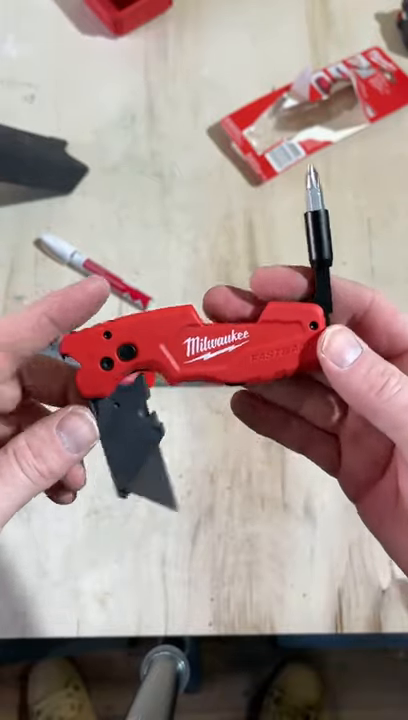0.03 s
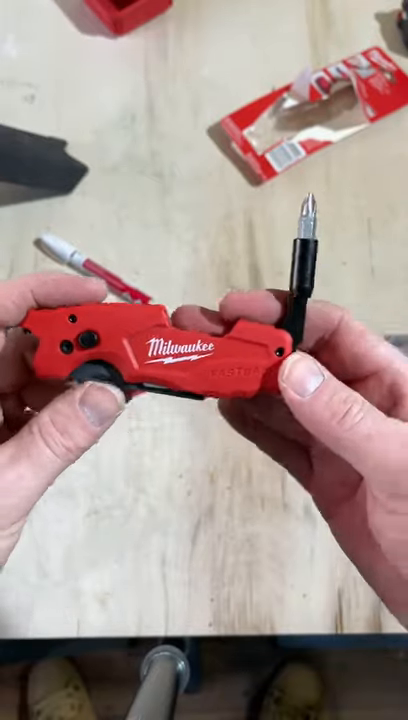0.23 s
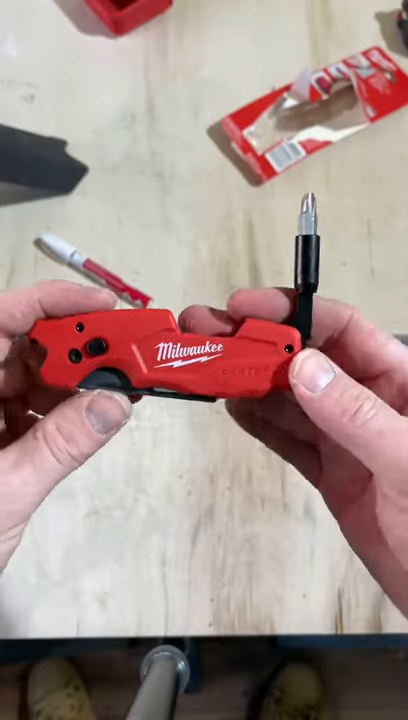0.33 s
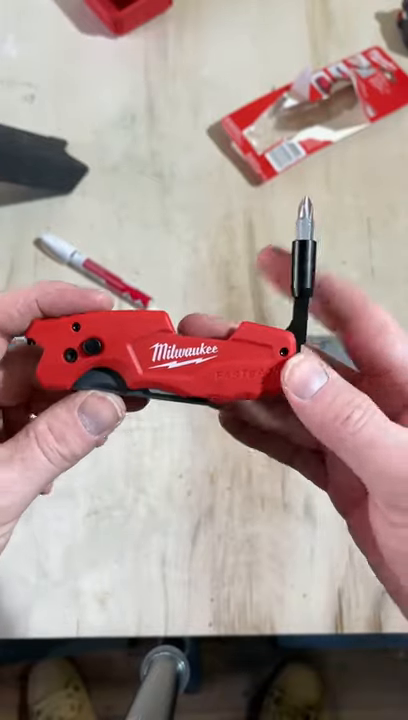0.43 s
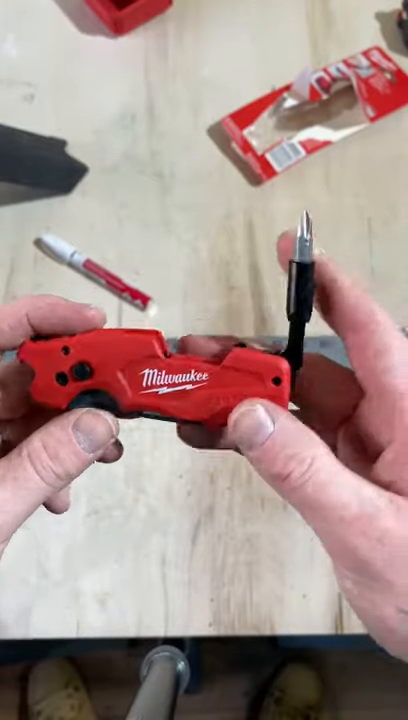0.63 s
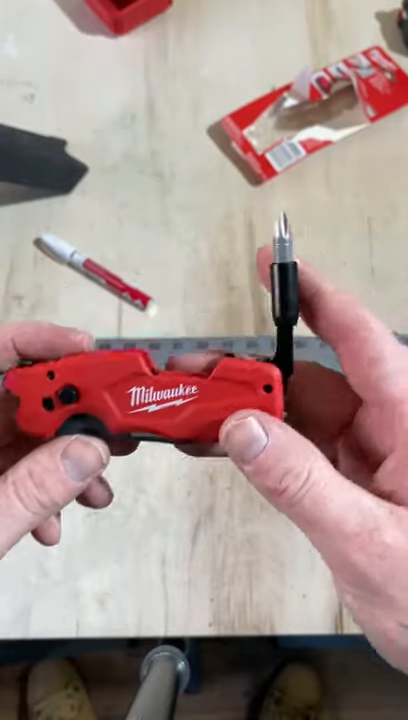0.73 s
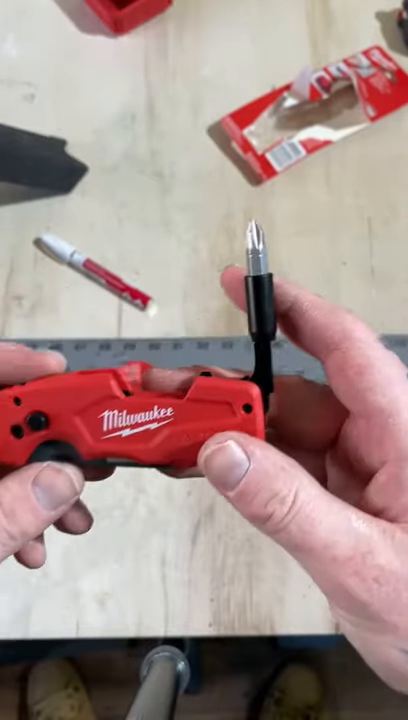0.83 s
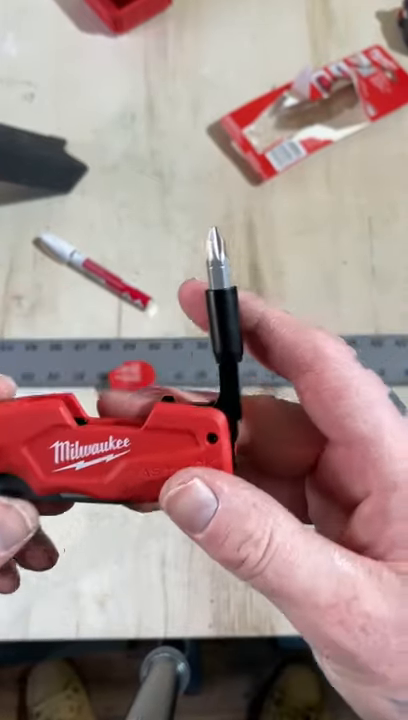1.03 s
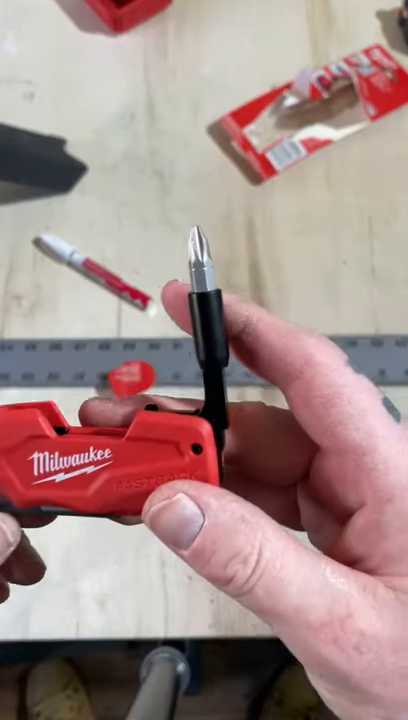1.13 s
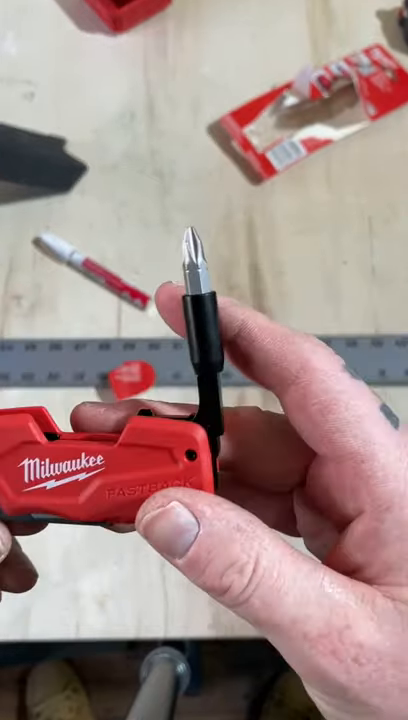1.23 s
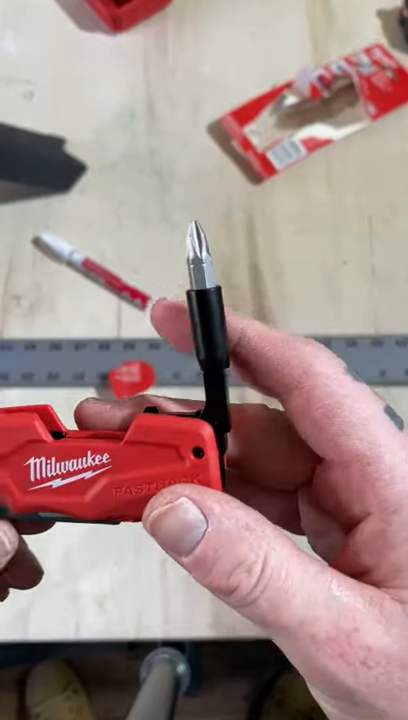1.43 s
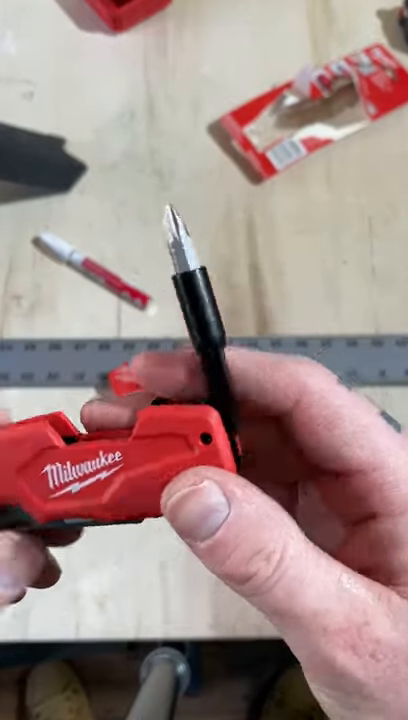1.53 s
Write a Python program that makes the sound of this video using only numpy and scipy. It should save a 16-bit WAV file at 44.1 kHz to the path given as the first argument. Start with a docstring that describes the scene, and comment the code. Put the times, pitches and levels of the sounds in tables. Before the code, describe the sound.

Faint finger rubbing, then the bright, sharp snap of a folding utility knife closing.

```python
"""A small room, over a workbench: a hand closes a folding utility knife.
Fingers rub the handle and the blade slides in, both a grainy, high friction hiss. The blade snaps
home in a burst of metal contacts, each a bright crack that rings the knife and the room.
The grip shifts and the handle ticks twice, damped by the hand. A low rumble lies underneath."""
import sys
import numpy as np
from scipy import signal
from scipy.fft import rfft, irfft
from scipy.io import wavfile
from scipy.ndimage import uniform_filter1d

SR = 44100
rng = np.random.default_rng(int(sys.argv[2]) if len(sys.argv) > 2 else 0)


def master(y):
    """Save y as 16-bit WAV."""
    cut = np.clip(np.atleast_2d(y).T, -1, 1)
    pcm = np.round(cut * 32767)  # scale
    wavfile.write(sys.argv[1], SR, pcm.astype(np.int16))


N = 70560
TIME = np.arange(N) / SR
HIT_TIME, ROOM_TIME = TIME[:SR // 16], TIME[:SR // 2]

# tone of the background rumble: frequency_hz, relative_db
RUMBLE_SPECTRUM = [(20, -15), (30, -11), (42, 3), (70, -3), (95, -12.5), (125, -12), (185, -19),
                   (240, -14.5), (320, -26), (500, -33), (1000, -42), (2500, -48.5), (4800, -54.5),
                   (7000, -53), (11000, -57), (15000, -56)]
# strokes of the fingers and the sliding blade: start_s, length_s, swell_s, low_db, middle_db, high_db
RUB_STROKES = [(0.071, .087, .045, -87, -77.5, -72.5), (0.161, 0.075, .005, -93, -88.5, -80),
               (0.231, .012, .016, -49, -49, -59), (0.442, 0.05, 0.0026, -70.5, -77, -86.5),
               (0.505, .055, .015, -85.5, -81, -84), (1.53, .09, .06, -87, -82, -84.5)]
# resonances that friction excites: pitch_hz, half_width_hz, band (0 low, 1 middle, 2 high)
RUB_RESONANCES = [(2480, 110, 0), (2820, 120, 0), (3650, 220, 0), (4150, 150, 1), (4520, 130, 1),
                  (5550, 350, 1), (7000, 1200, 1), (10400, 700, 2), (11700, 600, 2)]
# metal contacts of the blade and lock: start_s, level_db, dull_above_hz
SNAP_CONTACTS = [(0.2424, -9.5, 4507), (0.2434, -6, 4488), (0.2466, -4, 9000), (0.2476, -3, 12000),
                 (0.2490, 0.5, 12000), (0.2498, 0, 9000), (0.2519, -9, 12000), (0.2555, -13, 12000),
                 (0.2577, -13.5, 14000)]
# ring of the blade and handle, over a low 140 Hz thump: pitch_hz, level_db, t60_s
KNIFE_RING = [(140, -54.5, 0.089), (680, -42, 0.02), (800, -43.5, 0.015), (990, -41.5, 0.019),
              (1220, -35, .018), (1520, -28, .02), (2024, -25.5, 0.021), (2372, -23.5, 0.017),
              (2582, -21, .022), (2790, -22, .019), (3200, -20, 0.02194), (4040, -15, .019),
              (4317, -15, .019), (5477, -10, .016), (5790, -17.5, 0.021), (6410, -20.5, .016),
              (6890, -16.5, 0.016), (7635, -16.5, 0.013), (10690, -18, .015), (11686, -15, 0.019)]
# tone of each contact's crack: frequency_hz, relative_db
CRACK_SPECTRUM = [(150, -24), (450, -32), (700, -12), (1400, -4), (2500, 1), (4100, 2), (5500, 2.5),
                  (6500, 2), (8000, 4.5), (10000, 5), (12000, 5.5), (15000, -1.5)]
# ticks of the handle in the grip: start_s, level_db, dull_above_hz
GRIP_TICKS = [(0.7495, -49, 6000), (0.8013, -54, 2800)]
# ring of the gripped handle: pitch_hz, level_db, t60_s
GRIP_RING = [(419.6, -8.5, 0.034), (716, -11, .03), (1290, -4, .024), (1700, -8, .02), (3270, -6, 0.015),
             (4598, -4, .006), (10900, -16, .006)]
# tone of each tick's dull knock: frequency_hz, relative_db
KNOCK_SPECTRUM = [(200, -2.5), (450, 3), (1000, 1), (1900, -4), (2600, -13), (3300, -9.5), (4800, -9),
                  (5800, -22), (12000, -25)]
# tone of the room's tail: frequency_hz, relative_db
ROOM_SPECTRUM = [(300, 14.5), (700, 4), (1400, 3.5), (2150, -1), (2450, 7), (3300, 1), (4100, 4.5),
                 (5500, 5.5), (6600, 8), (8000, 4.5), (10000, 6), (12000, 0), (15000, 5)]
# decay of the room's tail: frequency_hz, t60_s
ROOM_DECAY = [(500, .36), (1300, 0.27), (3500, .265), (7000, .275), (12000, 0.18)]
# the microphone's uneven treble: frequency_hz, gain_db
MICROPHONE_EQ = [(1000, 0), (8000, 0), (8800, -10), (9600, -1), (11900, 0), (13300, -4), (14300, -21.5),
                 (16000, -24)]

ROOM_SEND_DB, RING_SEND_DB, TICK_SEND_DB = -14.5, -32, -7.5


def from_db(db):
    """Decibels to gain."""
    return 10 ** (np.asarray(db) / 20)


def rms_one(x):
    """Scale to an rms of one."""
    return x / np.sqrt(np.mean(x ** 2) + 1e-20)


def at_hz(points, hz):
    """Read a table on a log-frequency axis."""
    frequencies, values = np.transpose(points)
    return np.interp(np.log(np.maximum(hz, 1)), np.log(frequencies), values)


def convolve(x, response):
    """Pass a sound through an impulse response."""
    return signal.oaconvolve(x, response)[:len(x)]


def equalise(x, curve, size=2048):
    """Minimum-phase EQ along a curve of frequency_hz, gain_db."""
    gain = from_db(at_hz(curve, np.fft.rfftfreq(size, 1 / SR)))
    cepstrum = irfft(np.log(gain))
    cepstrum[1:size // 2] *= 2  # folded forward, so nothing rings ahead of an attack
    cepstrum[size // 2 + 1:] = 0
    return convolve(x, irfft(np.exp(rfft(cepstrum))))


def band_noise(low_hz, high_hz, count=N):
    """White noise through a band-pass."""
    bandpass = signal.butter(2, [low_hz, high_hz], "band", fs=SR, output="sos")
    return signal.sosfilt(bandpass, rng.standard_normal(count))


def rumble(level_db=-56.5):
    """A steady bed of low room rumble with a trace of hiss."""
    tone = from_db(at_hz(RUMBLE_SPECTRUM, np.fft.rfftfreq(N, 1 / SR)))
    bed = irfft(rfft(rng.standard_normal(N)) * tone, N)
    return from_db(level_db) * rms_one(bed)


def rubs(grain_s=0.0014, grain_db=2, release_s=0.02):
    """Grainy friction excites three bands of resonances; each stroke swells and fades."""
    roughness = rms_one(uniform_filter1d(rng.standard_normal(N), int(grain_s * SR)))
    grain = from_db(grain_db * roughness)
    bands, friction = np.zeros((3, N)), 0
    for hz, half_width_hz, band in RUB_RESONANCES:
        bands[band] += rms_one(band_noise(hz - half_width_hz, hz + half_width_hz))
    bands = np.array([rms_one(band * grain) for band in bands])
    for start_s, length_s, swell_s, *levels_db in RUB_STROKES:
        swell = np.clip((TIME - start_s) / swell_s, 0, 1)
        fade = np.clip((start_s + length_s - TIME) / release_s + 0.5, 0, 1)
        friction += swell * fade * (from_db(levels_db) @ bands)
    return friction


def room_reverb(x, onset_s=0.003):
    """The small room answers with a diffuse tail that builds quickly and dies band by band."""
    edges_hz, tail = np.geomspace(200, 18000, 12), 0
    for low_hz, high_hz in zip(edges_hz, edges_hz[1:]):
        t60_s = at_hz(ROOM_DECAY, np.sqrt(low_hz * high_hz))
        tail += band_noise(low_hz, high_hz, len(ROOM_TIME)) * from_db(-60 * ROOM_TIME / t60_s)
    build_up = np.minimum(ROOM_TIME / onset_s, 1) ** 2
    tail = equalise(tail * build_up, ROOM_SPECTRUM)
    return convolve(x, rms_one(tail) / np.sqrt(len(tail)))  # a tail of unit energy


def hit(response, start_s, level_db, dull_above_hz):
    """Set a response off on cue, at its own level, dulled above its own cutoff."""
    track, start = np.zeros(N + SR), int(start_s * SR)
    pole = np.exp(-2 * np.pi * dull_above_hz / SR)
    dulled = signal.lfilter([1 - pole], [1, -pole], response)
    track[start:start + len(response)] = from_db(level_db) * dulled
    return track[:N]


def ringing(modes):
    """A struck body rings as damped sines of alternating sign."""
    return sum((-1) ** k * from_db(db - 60 * HIT_TIME / t60_s) * np.sin(2 * np.pi * hz * HIT_TIME)
               for k, (hz, db, t60_s) in enumerate(modes))


def contact_burst(spectrum, energy_db, t60_s):
    """A rough contact gives a burst of noise that dies at once."""
    burst = rng.standard_normal(len(HIT_TIME)) * from_db(-60 * HIT_TIME / t60_s)
    return from_db(energy_db) * rms_one(equalise(burst, spectrum)) / np.sqrt(len(burst))


def cracks():
    """The bright crack of every metal contact, as it leaves the knife in one direction."""
    return sum(hit(contact_burst(CRACK_SPECTRUM, energy_db=3, t60_s=0.0077), *contact)
               for contact in SNAP_CONTACTS)


def snap(directions=3):
    """The blade snaps home: crack and ring arrive direct, cracks thrown elsewhere return as reverb."""
    body = ringing(KNIFE_RING)
    ring = sum(hit(body, *contact) for contact in SNAP_CONTACTS)
    direct = cracks() + ring
    scattered = sum(room_reverb(cracks()) for _ in range(directions)) / np.sqrt(directions)
    return direct + from_db(ROOM_SEND_DB) * scattered + from_db(RING_SEND_DB) * room_reverb(ring)


def grip_ticks():
    """Soft knocks in the handle as the grip shifts, damped by the hand."""
    ring = ringing(GRIP_RING)
    return sum(hit(ring + contact_burst(KNOCK_SPECTRUM, energy_db=14, t60_s=0.016), *tick)
               for tick in GRIP_TICKS)


def scene():
    """Knife and hands up close, the room behind them, in mono."""
    knife, friction, ticks = snap(), rubs(), grip_ticks()
    room = room_reverb(from_db(ROOM_SEND_DB) * friction + from_db(TICK_SEND_DB) * ticks)
    return (knife + friction + ticks + room + rumble())[None]


def record(dry):
    """The microphone colours the treble, peaks are soft-clipped and the very top is cut."""
    rounded = np.tanh(equalise(dry[0], MICROPHONE_EQ))
    high_cut = signal.cheby2(16, 60, 16300, fs=SR, output="sos")  # 60 dB down from 16.3 kHz
    return signal.sosfilt(high_cut, rounded)[None]


dry = scene()
out = record(dry)
master(out)
```